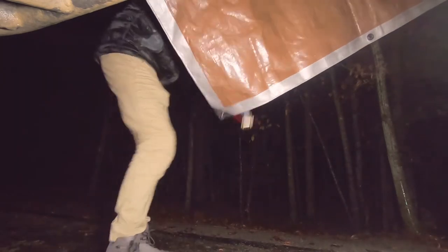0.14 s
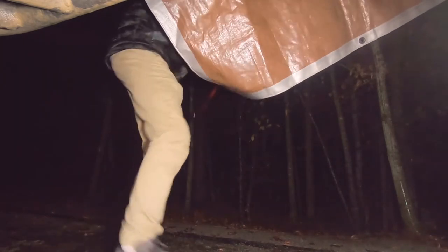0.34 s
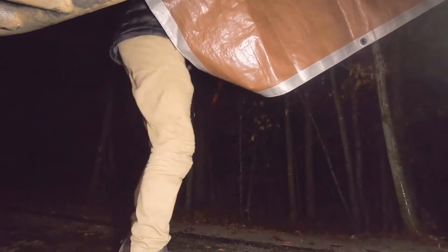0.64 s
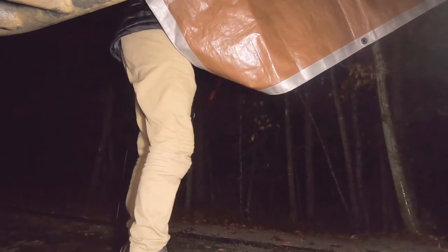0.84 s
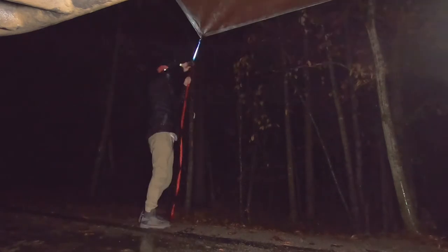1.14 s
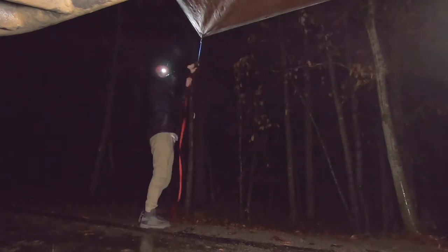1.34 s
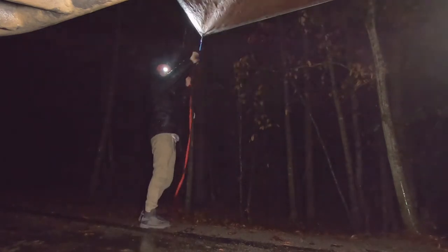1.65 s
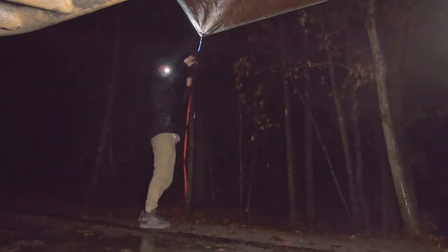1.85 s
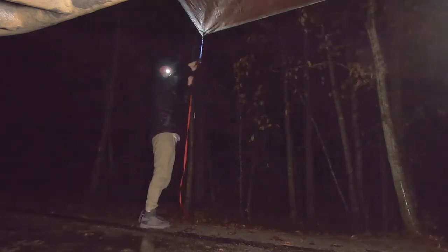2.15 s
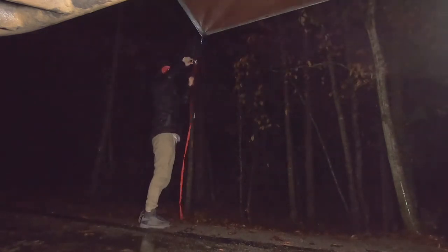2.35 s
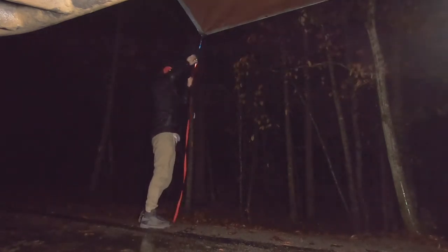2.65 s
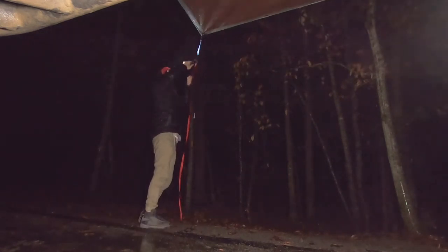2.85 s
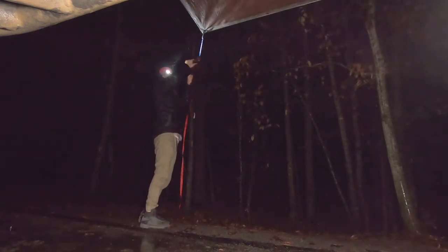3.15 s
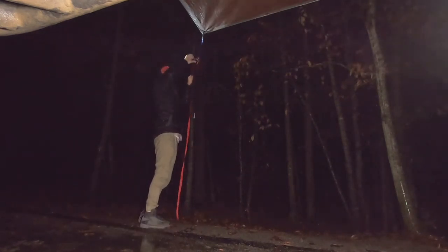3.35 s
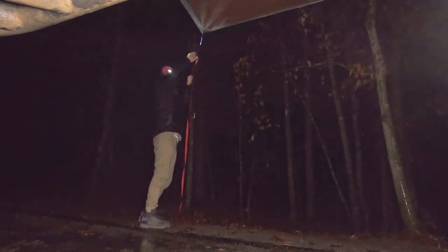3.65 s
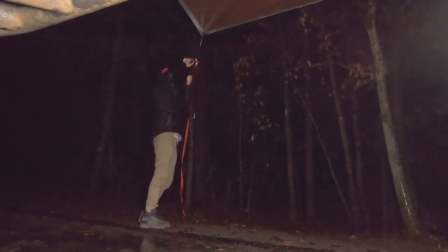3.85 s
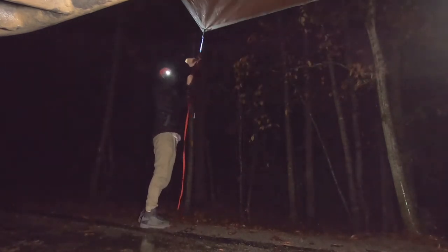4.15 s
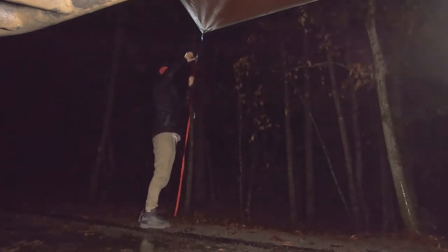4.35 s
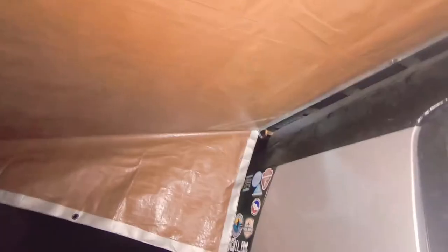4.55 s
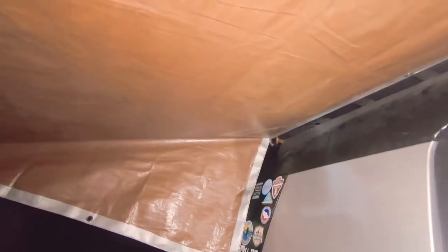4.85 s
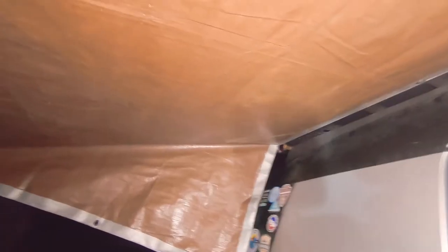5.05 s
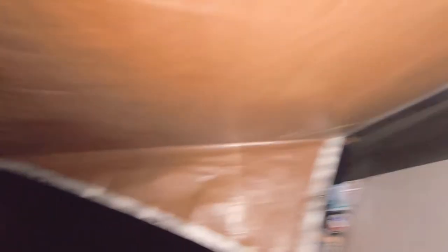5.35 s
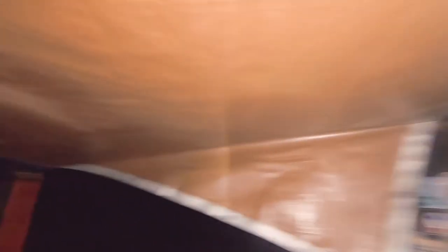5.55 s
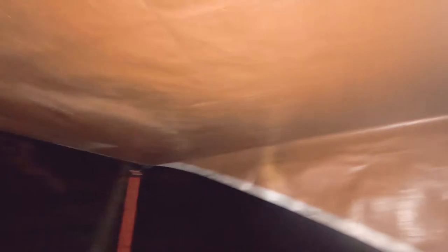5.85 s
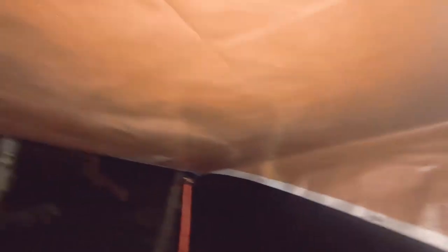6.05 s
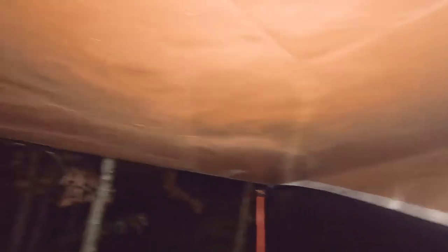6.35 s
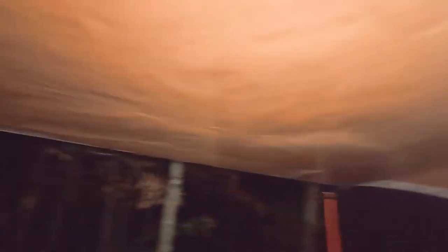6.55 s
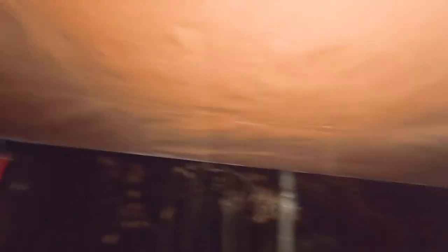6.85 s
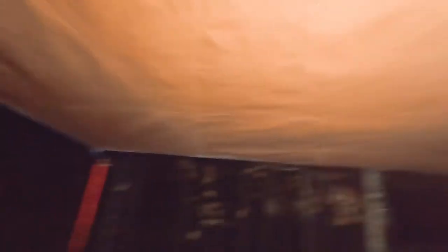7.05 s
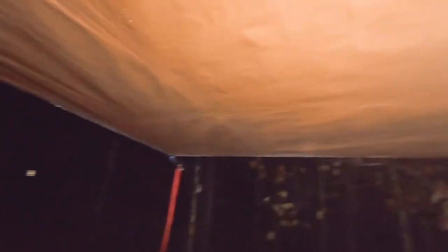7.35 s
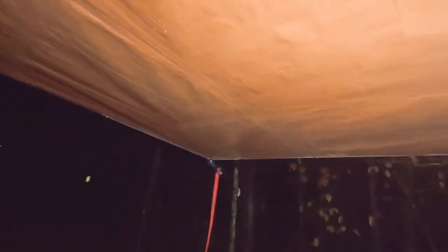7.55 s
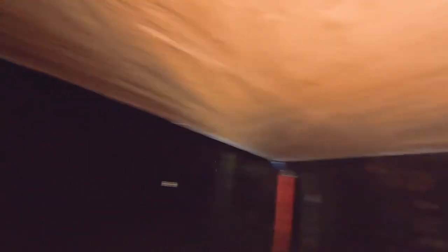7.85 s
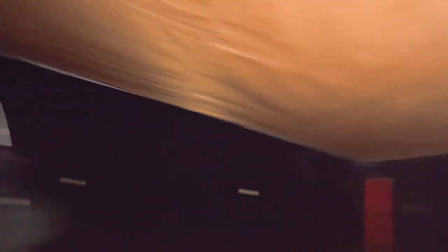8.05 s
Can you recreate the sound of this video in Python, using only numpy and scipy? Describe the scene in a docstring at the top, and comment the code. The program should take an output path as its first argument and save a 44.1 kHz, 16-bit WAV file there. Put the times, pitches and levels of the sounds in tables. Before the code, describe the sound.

Night rain in the woods: scattered drops smack a plastic sheet, metal clicks tick, then the microphone moves underneath and the drops crowd closer.

```python
"""Far rain hisses in the wood and big drops slap a plastic tarp; middling ones drip, small ones patter.
A strap ratchet clicks a few steps away; then the microphone is carried under the sheet,
knocks once and rumbles in the hand. The drops are shaped noise bursts through resonances, the rain
and rumble coloured noise, the clicks and the knock decaying sines, the clicks with a noise burst.
The two ports of the microphone hear nearly the same, except for the rumble."""
import sys
import numpy as np
from scipy import signal
from scipy.fft import rfft, irfft, next_fast_len
from scipy.io import wavfile
from scipy.ndimage import uniform_filter1d

SR = 44100
rng = np.random.default_rng(int(sys.argv[2]) if len(sys.argv) > 2 else 0)


def int16_out(signal):
    """Quantize to a 16-bit WAV file."""
    q = np.round(np.clip(np.atleast_2d(signal).T, -1, 1) * 32767)
    wavfile.write(sys.argv[1], SR, q.astype(np.int16))


N = 361619  # length in samples

MOVE_S = 4.45  # the microphone goes under the sheet
UNDER_DB = 3  # drips and patter gain this much once the sheet is overhead
HISS_DB, PATTER_DB = -6.5, -47  # the hiss against the wash; the patter beside the sheet
DRIP_DB, DRIP_SCATTER_DB, DRIP_HZ = -27, 2.5, 1400  # slap beside the sheet, its scatter, usual pitch
DRIP_COLOUR_DB, DRIP_COLOUR_SCATTER_DB = [-10, -4, -14], 4  # thud, crack, snap against the slap
SLAP_WIDTH, CRACK_WIDTH_HZ = 0.83, 3020  # the slap's width over its pitch; the crack's width
SNAP_DB, SNAP_SCATTER_DB = -9.5, 4  # a big drop's snap against its slap; chance scatter
SNAP_FOLLOWS, SNAP_DULLS = .3, .4  # dB of snap gained per dB of crack, lost per dB of slap
USUAL_DB = -14  # slap of a strong big drop
HAND_PAN_DB = 8  # rumble, left over right
TOP_HZ = 15900  # the recorder's band limit


def amp(db):
    """Decibels to amplitude."""
    return 10 ** (np.asarray(db) / 20)


def unit(x):
    """Scale to an rms of 1."""
    return x / np.sqrt(np.mean(x ** 2) + 1e-20)


def along(points, hz):
    """Read a curve of (Hz, value) points on a log frequency axis."""
    f, v = np.transpose(points)
    return np.interp(np.log(hz + 1), np.log(f + 1), v)


def curves(rows):
    """One value per sample for each column after the time."""
    s, *cols = np.transpose(rows)
    return [np.interp(np.arange(N) / SR, s, c) for c in cols]


def filtered(x, response):
    """Multiply the spectrum of x by a response of frequency."""
    m = next_fast_len(N + SR)
    return irfft(rfft(x, m) * response(np.fft.rfftfreq(m, 1 / SR)), m)[..., :N]


def peak(f, hz, width_hz):
    """Response of a causal resonance."""
    return 1j * f * width_hz / (hz * hz - f * f + 1j * f * width_hz)


def place(s, rows):
    """Sum short sounds, one a row, at their times."""
    at = np.round(s * SR).astype(int)[:, None] + np.arange(rows.shape[1])
    return np.bincount(at.ravel(), rows.ravel(), N + SR)[:N]


def noise(spectrum, patchy_db, flicker_db):
    """Coloured noise of rms 1, with patches of random gain and a fast flicker shared by all bands."""
    z = signal.stft(rng.standard_normal(N), nperseg=128)[2]
    field = uniform_filter1d(rng.standard_normal(z.shape), size=9, axis=0)  # smooth over frequency
    field = uniform_filter1d(field, size=7, axis=1)  # and over time
    flicker = uniform_filter1d(rng.exponential(size=z.shape[1]) - 1, size=3)
    gain_db = patchy_db * unit(field) + flicker_db * np.minimum(unit(flicker), 1.8)
    x = signal.istft(z * amp(gain_db), nperseg=128)[1][:N]
    return unit(filtered(x, lambda hz: amp(along(spectrum, hz))))


def far_rain(wash_db):
    """Countless distant drops merge into a grainy wash and a hiss."""
    # colour of the wash beside the sheet: pitch_hz, relative level_db (per Hz)
    wash_open = [(24, -43), (40, 1.5), (169, -6.5), (241, -12.5), (419, 7), (683, 1), (932, 7.5), (1110, 3),
                 (1660, 1.5), (1940, -0.5), (4400, -1), (8000, -27), (10400, -50), (17600, -120)]
    # colour of the wash under the sheet: pitch_hz, relative level_db (per Hz)
    wash_under = [(47, -39), (80, 5), (97, 0), (183, 1.5), (480, 3.5), (605, 4.5), (1160, 9.5), (1390, 6),
                  (4320, 5), (8000, -25.5), (10400, -20), (17600, -120)]
    # colour of the hiss: pitch_hz, relative level_db (per Hz)
    hiss = [(3500, -5), (6000, -8.5), (8000, -10.5), (12000, -15), (15000, -17), (16000, -12)]
    under = np.clip((np.arange(N) / SR - MOVE_S) / 0.088 + .5, 0, 1)  # 0.088 s to pass the edge
    beside = noise(wash_open, patchy_db=2.0, flicker_db=4.5)
    below = noise(wash_under, patchy_db=2.0, flicker_db=4.5)
    wash = np.sqrt(1 - under) * beside + np.sqrt(under) * below
    return amp(wash_db) * (wash + amp(HISS_DB) * noise(hiss, patchy_db=1.5, flicker_db=-1.2))


def splashes(s, db, slap_hz, thud_db, crack_db, snap_db, size, splash_s, spray):
    """A drop, one blow and a spray of droplets, slaps the struck patch and thuds the sheet; a crack near 4.3
    kHz and a snap ring with each blow."""
    # resonances of the slack sheet: pitch_hz, width_hz, relative level_db
    sheet_modes = [(186, 600, -16.5), (488, 193, -7), (900, 96, -19.5)]
    t, f = np.arange(size) / SR, np.fft.rfftfreq(size, 1 / SR)
    chance = rng.standard_normal((len(s), size))
    blow = spray * chance ** 3 * np.exp(-t / splash_s)  # cubing leaves a few strong droplets
    blow[:, 0] = -1
    lag = .0021 + .0004 * chance[:, :1]  # seconds; the ground returns each blow once
    z = rfft(blow) * (1 + 0.13 * np.exp(-2j * np.pi * f * np.abs(lag)))
    soft = 1 / (1 + 1j * f / 5500) ** 2  # water spreads on contact and rounds the blow
    low_cut = 1j * f / (350 + 1j * f)
    slap = soft * peak(f, slap_hz[:, None], SLAP_WIDTH * slap_hz[:, None]) * low_cut
    thud = soft * sum(amp(g_db) * peak(f, c, w) for c, w, g_db in sheet_modes)
    crack = peak(f, 4300, CRACK_WIDTH_HZ) ** 2 / (1 + 1j * f / 7000)
    snap = peak(f, 8500, 8000) ** 2 / (1 + 1j * f / 9000)
    rows = 0
    for part, part_db in zip([slap, thud, crack, snap], [0 * db, thud_db, crack_db, snap_db]):
        y = irfft(z * part, size)
        rows = rows + amp(db + part_db)[:, None] * y / np.max(np.abs(y), axis=1, keepdims=True)
    return place(s, rows)


def patter(level_db):
    """Many small drops at random moments, of random size and colour."""
    count = 1800
    u, g = rng.random((count, 2)), rng.standard_normal((count, 4))
    db = -4 * np.log(1 - u[:, 1] * .94)  # mostly small, a few up to 11 dB louder
    slap_hz = 1500 * np.exp(.45 * g[:, 0])
    colour_db = [-9, -2, -16] + np.clip(g[:, 1:], -1.5, 1.5) * 1.0  # thud, crack, snap
    x = splashes(u[:, 0] * N / SR, db, slap_hz, *colour_db.T, size=512, splash_s=.0009, spray=.05)
    return amp(level_db) * unit(x)


def drips():
    """Middling drops at random moments, about a dozen a second."""
    count = 100
    u, g = rng.random(count), np.clip(rng.standard_normal((count, 5)), -2, 2)
    db = DRIP_DB + DRIP_SCATTER_DB * g[:, 0]
    slap_hz = DRIP_HZ * np.exp(0.41 * g[:, 1])
    colour_db = DRIP_COLOUR_DB + DRIP_COLOUR_SCATTER_DB * g[:, 2:]
    return splashes(u * N / SR, db, slap_hz, *colour_db.T, size=1024, splash_s=0.0031, spray=0.057)


def big_drops():
    """Heavy drops off the branches: a harder crack brings a harder snap, the heaviest land duller."""
    # each drop: start_s, slap level_db, slap pitch_hz, thud_db and crack_db (both against the slap)
    drops = [(0.025, -21.5, 980, 2.5, -13), (0.075, -15, 2560, -11, -6), (0.1475, -27.5, 840, 2.5, 9),
             (0.237, -17, 1190, -3.5, -6), (0.3457, -20.5, 2680, -7, -24), (0.373, -18.5, 1660, 3.5, -23),
             (0.4512, -18.5, 1740, -4, 4.5), (0.5387, -18, 1720, -22, -14), (0.583, -20, 1320, -21, -15),
             (0.6618, -20.5, 1970, -22, -0.5), (0.7278, -22, 1300, 6, 7), (0.7886, -20, 730, -18, -12),
             (0.851, -28, 1230, -4, -12), (0.8966, -22.5, 1340, -28, -15), (1.1655, -20.5, 1020, -6, -4),
             (1.2324, -34, 1510, 14, -16), (1.3047, -19, 1390, -2, -2), (1.4323, -18.5, 900, -4.5, -8),
             (1.5965, -21.5, 860, -11, -17), (1.6136, -27, 930, 6.5, -8), (1.8382, -18, 1100, 2, -18),
             (2.1789, -21, 960, 0.5, -26), (2.2042, -24, 930, 1.5, 2), (2.2475, -24, 1120, 6, -22),
             (2.3605, -18.5, 1200, -12, -28), (2.444, -23.5, 730, -3, -6), (2.5288, -26.5, 910, 9, 0),
             (2.629, -29, 1270, 5, -14), (2.7224, -23, 1270, -22, -5), (2.7745, -30.5, 2390, 10.5, -13),
             (2.813, -26.5, 970, 2.5, 5), (2.905, -20.5, 1030, -6, -11), (3.0918, -21.5, 880, -9, -22),
             (3.129, -29, 805, -2, 9.5), (3.466, -29.5, 1120, 11.5, 8), (3.64, -29.5, 940, 11, 7.5),
             (3.7833, -23, 2560, -0.5, -7), (4.0133, -18.5, 910, -2, -17), (4.1052, -22.5, 885, 8, -30),
             (4.3405, -20, 1310, -12, 0), (4.3997, -26, 855, 5.5, -11), (4.4623, -24, 900, 7, -3),
             (4.592, -23, 1720, -8, -18), (4.6186, -15.5, 840, -24, -2), (4.6708, -13, 1090, -22, -10),
             (4.6926, -19, 1160, -3, -11), (4.7036, -15, 980, -28, -6), (4.7458, -13.5, 1470, -15, -26),
             (4.8624, -20.5, 970, -5, -6), (4.97, -21, 1760, -32, -24), (5.0132, -19, 2000, -21, -15),
             (5.0391, -18, 2370, -7, -15), (5.0586, -17, 1310, -22, -10), (5.126, -16.5, 2580, -12, -15),
             (5.1664, -14, 870, -18, -19), (5.1984, -17, 1240, -26, -22), (5.226, -24.5, 750, -18, 6.5),
             (5.2712, -18.5, 980, -28, -15), (5.3686, -10, 825, -8, -26), (5.415, -19, 1700, -6, 0),
             (5.5387, -15.5, 1240, -12, -22), (5.631, -21.5, 1700, -22, -8), (5.7428, -19.5, 1310, -10, -1),
             (5.781, -14.5, 2100, -9, -15), (5.814, -15, 2240, -19, -19), (5.891, -15.5, 890, -22, -28),
             (5.955, -17.5, 1080, -10, 3.5), (6.0907, -21.5, 860, -11, 2), (6.1298, -19.5, 990, -25, -18),
             (6.137, -8.5, 2410, -6.5, 0), (6.1467, -24, 1100, -17, -13), (6.1741, -12.5, 1080, -31, -3),
             (6.214, -20, 2450, -23, -1), (6.228, -10.5, 980, -8, -12), (6.2436, -21.5, 745, -4, 6),
             (6.2835, -17.5, 2280, -11, -20), (6.3198, -12, 1430, -2, -19), (6.3592, -21, 1240, -17, 3),
             (6.4201, -17.5, 1300, -18, -31), (6.436, -22.5, 1000, -8, 2.5),
             (6.5077, -20.5, 2080, -20, -13), (6.5178, -30, 840, -17, -1), (6.6896, -20.5, 1980, -1, 1),
             (6.8214, -35, 1610, -16, 17.5), (6.8766, -20, 1360, -1.5, -12), (6.9439, -27.5, 820, 0, 7.5),
             (6.968, -20, 1660, -4, -27), (6.9793, -21.5, 750, 0, -12), (7.0128, -16, 845, -12, 0.5),
             (7.0652, -26.5, 1230, 1, -10), (7.0815, -18.5, 910, -37, 0), (7.14, -19, 1370, -5.5, -5),
             (7.2858, -21.5, 1470, -25, -12), (7.355, -24, 930, -3, 3), (7.378, -23, 840, -8, 4),
             (7.464, -22, 750, -12, 6), (7.483, -19, 970, 5, 1.5), (7.514, -25, 1010, -8, 1),
             (7.684, -18, 1750, -5, -5), (7.7214, -15, 1600, -5, -6), (7.8085, -20.5, 1370, -26.5, -4),
             (7.8802, -15.5, 2407, -9, -7), (7.902, -17, 2390, -24, -16), (8.0005, -19, 1260, 1.5, 4.5),
             (8.044, -25, 784, 7, 4), (8.0901, -20, 1010, -9, 1), (8.1254, -21.5, 780, -20, 2.5)]
    s, db, hz, thud_db, crack_db = np.transpose(drops)
    snap_db = SNAP_DB + SNAP_FOLLOWS * crack_db - SNAP_DULLS * (db - USUAL_DB)
    snap_db = snap_db + SNAP_SCATTER_DB * rng.standard_normal(len(s))
    return splashes(s, db, hz, thud_db, crack_db, snap_db, size=1024, splash_s=0.0019, spray=0.044)


def ratchet():
    """Each click rings the steel pawl briefly, and the pawl bounces a few times."""
    # pawl clicks: start_s, relative level_db, low_lift_db (modes below 5500 Hz)
    clicks = [(1.0928, -23.5, -4), (1.147, -23.5, 4), (1.286, -24, 1), (1.5263, -25, 9.5),
              (1.577, -22.5, 7), (1.6202, -29.5, 10), (1.8992, -24.5, 5), (1.9594, -22.5, -4),
              (2.294, -33.5, 8), (2.391, -24.5, 12), (2.493, -34, 16.5), (2.767, -18.5, -2),
              (2.824, -24.5, 2), (2.9433, -24, 3), (3.315, -29, 7.5), (3.385, -28, 9.5), (3.487, -33, 11),
              (3.7735, -25, 4), (3.8795, -22, 6), (4.2013, -36, 3), (4.356, -23, 6)]
    # ringing modes of the pawl: pitch_hz, relative level_db, t60_s (time to fall 60 dB)
    pawl = [(3800, -9, .01), (4400, -7, .011), (5000, -7, .011), (6350, -8, .011), (7600, -3, .011),
            (8800, -7, .011), (9800, -4, .011), (11300, -8, .009), (13100, -8, .009), (14600, -8, .009)]
    # the pawl settles: lag_s after the click, level_db against it
    bounces = [(0, 4), (.0085, -8), (.016, -22), (.023, -39)]
    t = np.arange(SR // 16) / SR
    s, db, low_db = np.transpose(clicks)
    attack = 1 - np.exp(-t / 0.00028)
    out = 0
    for lag, lag_db in bounces:
        ring = 1.3 * np.exp(-t / .0022) * rng.standard_normal((len(s), len(t)))  # noise of the contact
        for hz, mode_db, t60 in pawl:
            g = rng.standard_normal((len(s), 3))  # chance in level, pitch and phase
            lift_db = (hz < 5500) * low_db[:, None]
            level = amp(mode_db + lift_db + 2 * g[:, :1] - 60 * t / t60)
            ring += level * np.sin(2 * np.pi * hz * (1 + .02 * g[:, 1:2]) * t + 3 * g[:, 2:])
        out = out + place(s + lag, amp(db + lag_db - 4.0)[:, None] * ring * attack)
    return filtered(out, lambda hz: peak(hz, 5000, 24000) ** 2)


def echoes(x, t60, dull_hz):
    """The ground and trunks scatter a short dull tail."""
    t = np.arange(SR // 5) / SR
    tail = rng.standard_normal(len(t)) * amp(-60 * t / t60) * (t > .002)
    wet = signal.fftconvolve(x, tail / np.linalg.norm(tail))[:N]
    return filtered(wet, lambda hz: 1 / (1 + 1j * hz / dull_hz))


def hand():
    """The hand shakes the microphone body; a knock sets the grip swinging."""
    # shaking before the pan: start_s, sway level_db, tremor level_db
    shaking = [(0, -53, -67), (.9, -54, -71), (1.11, -43, -66), (3.92, -45, -65), (4.03, -35, -57),
               (4.36, -41, -73), (4.51, -19.5, -31), (4.75, -19.5, -47), (5.2, -25, -35),
               (5.57, -19.5, -38), (6.34, -25.5, -38.5), (6.7, -22, -42), (7.2, -23, -44), (7.4, -26, -48),
               (7.8, -21, -40), (8.02, -25, -35), (8.2, -14.5, -44)]
    # colour of the slow sway: pitch_hz, relative level_db (per Hz)
    sway_colour = [(2, 17.5), (4, 21.5), (18, 13.5), (26, -25), (40, -73), (100, -120)]
    # colour of the quicker tremor: pitch_hz, relative level_db (per Hz)
    tremor_colour = [(18, -51), (25, 2), (34, 1), (42, -35), (55, -17), (70, -62), (120, -120)]
    # knocks on the microphone: start_s, relative level_db
    knocks = [(4.915, -6)]
    # swinging modes of the grip: pitch_hz, relative level_db, t60_s (time to fall 60 dB)
    grip = [(18.5, 2, .45), (35, -15, 2.8), (62, -13, .15), (120, -24, .08), (225, -26, .1)]
    sway_db, tremor_db = curves(shaking)
    sway = noise(sway_colour, patchy_db=0.0, flicker_db=-5.5)
    tremor = noise(tremor_colour, patchy_db=0.0, flicker_db=-5.5)
    sway /= np.sqrt(np.abs(uniform_filter1d(sway ** 2, size=SR // 2)))  # muscles hold the swing even
    shake = amp(sway_db) * sway + amp(tremor_db) * tremor
    t, swing = np.arange(N) / SR, 0
    for s, db in knocks:
        age = np.maximum(t - s, 0)
        modes = sum(amp(db + g_db - 60 * age / t60) * np.sin(2 * np.pi * hz * age)
                    for hz, g_db, t60 in grip)
        swing += modes * (1 - np.exp(-age / .004))
    # the swing reaches one port about 2.4 dB louder than the other
    return shake * amp([[HAND_PAN_DB / 2], [-HAND_PAN_DB / 2]]) + swing * amp([[1.2], [-1.2]])


def scene():
    """Drops, clicks and their echoes stand in the middle; a faint steady noise widens the stereo."""
    # far rain: start_s, wash level_db
    rain = [(0, -38), (.5, -39), (.96, -41), (1.3, -39), (2.24, -41.5), (3.24, -41.5), (3.83, -38.5),
            (4.32, -41.5), (4.6, -36.5), (5.4, -38), (5.94, -41), (6.96, -39.5), (7.15, -42.5),
            (7.49, -38.5), (8.2, -40.5)]
    # the faint side noise against the mid: pitch_hz, level_db
    apart = [(60, -15), (300, -17.5), (1000, -45.5), (4000, -42), (12000, -17.5)]
    wash_db, = curves(rain)
    closer = amp(UNDER_DB * (np.arange(N) / SR > MOVE_S))
    near = big_drops() + closer * (drips() + patter(PATTER_DB))
    clicks = ratchet()
    wet = amp(-9.0) * echoes(near, t60=0.078, dull_hz=6340)
    wet = wet + amp(-4) * echoes(clicks, t60=0.12, dull_hz=14000)
    mid = near + clicks + wet + far_rain(wash_db)
    side = filtered(far_rain(wash_db), lambda hz: amp(along(apart, hz)))
    return np.array([mid + side, mid - side]) + hand()


def record(dry):
    """The recorder fades toward its top and keeps nothing above its band limit."""
    return filtered(dry, lambda hz: (hz < TOP_HZ) / (1 + (hz / 15000) ** 6))


dry = scene()
out = record(dry)
int16_out(out)
```